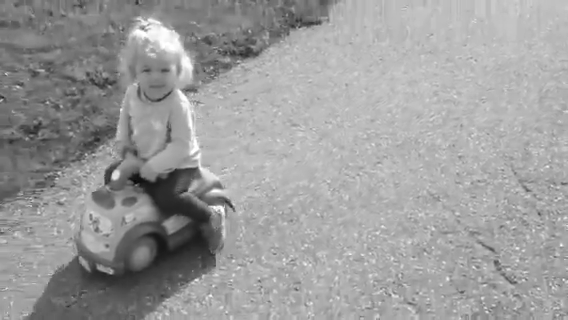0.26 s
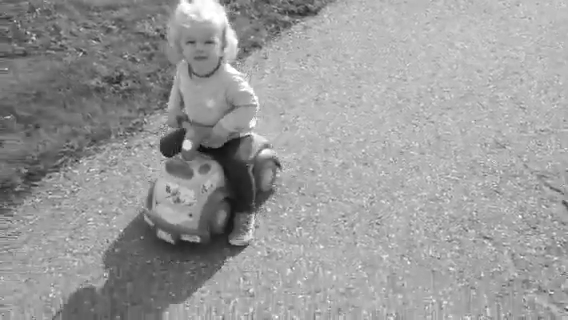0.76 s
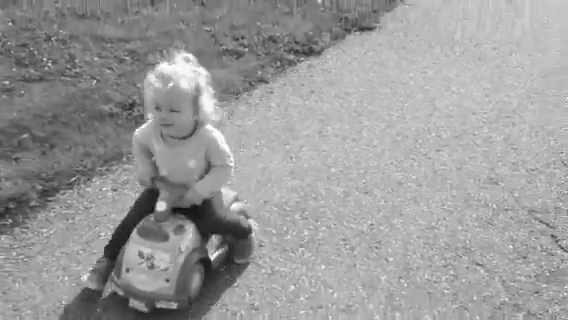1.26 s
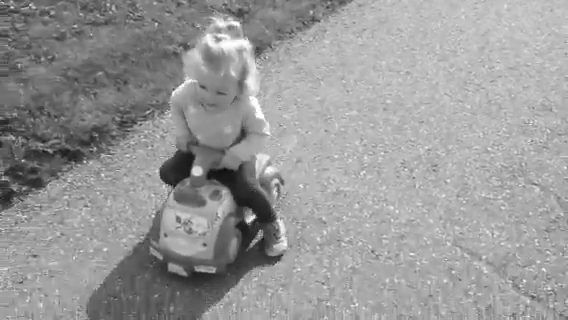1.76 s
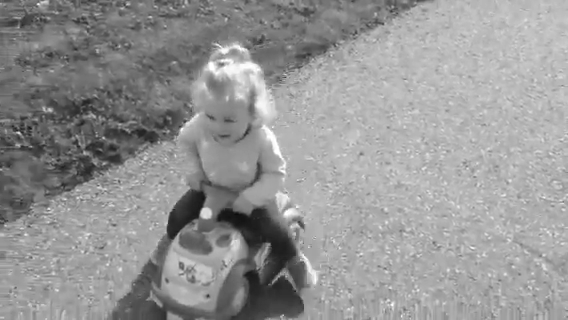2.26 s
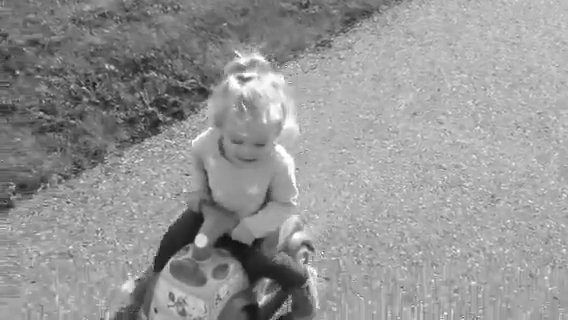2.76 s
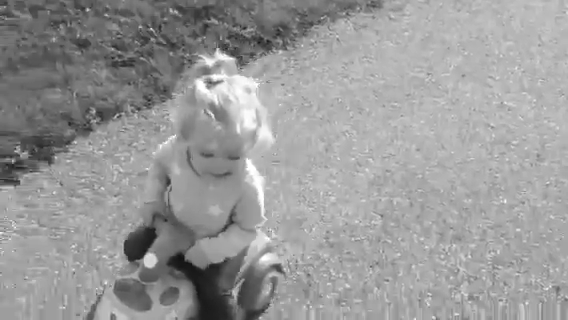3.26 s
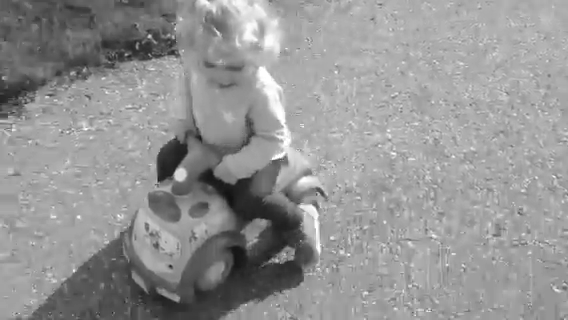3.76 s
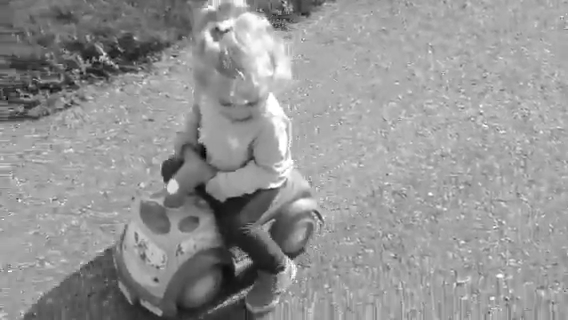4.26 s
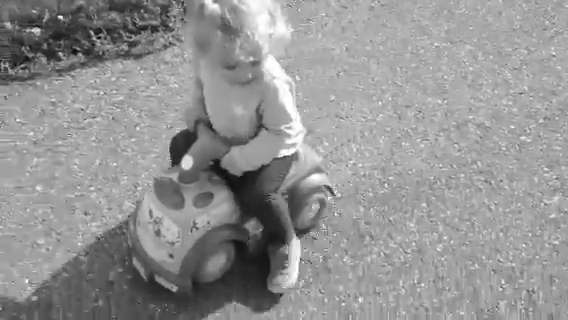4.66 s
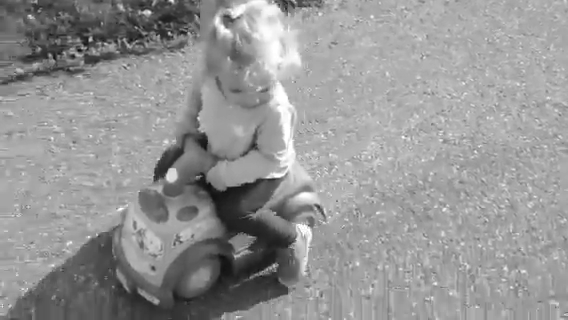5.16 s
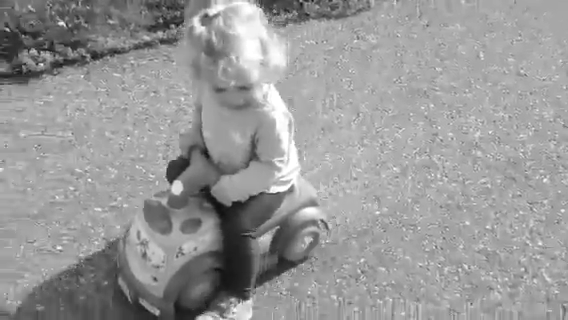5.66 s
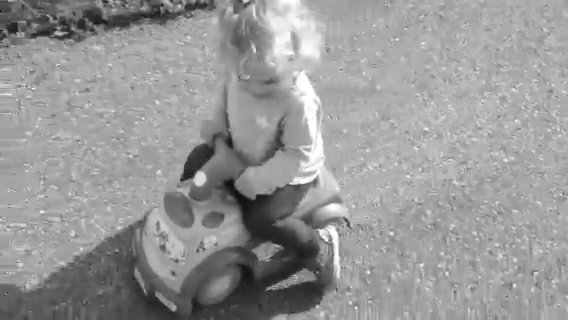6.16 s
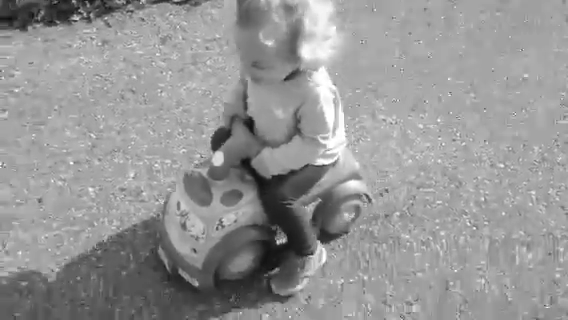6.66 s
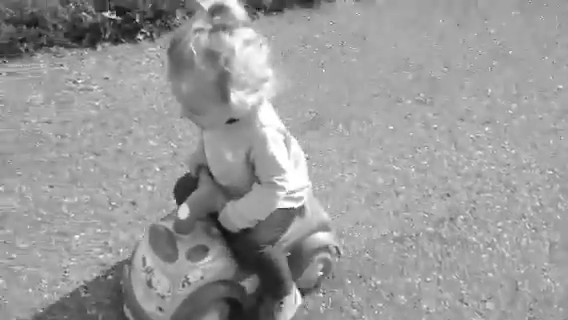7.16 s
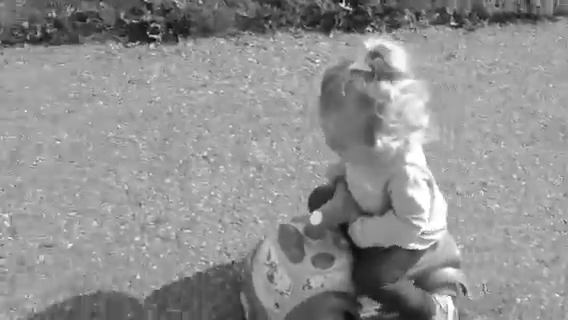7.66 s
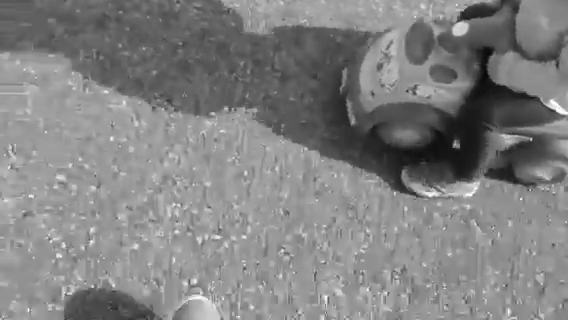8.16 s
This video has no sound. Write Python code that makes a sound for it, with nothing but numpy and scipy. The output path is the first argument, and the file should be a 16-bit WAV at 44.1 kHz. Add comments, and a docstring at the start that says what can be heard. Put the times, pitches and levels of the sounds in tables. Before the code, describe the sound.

A small plastic ride-on toy rolls unevenly along gritty pavement outdoors, booming hollowly, rattling and pinging, with brief scuffs, dull bumps and light wind puffs.

```python
"""Plastic ride-on toy on asphalt

A hollow toy is pushed along rough asphalt, a few steps from a hand-held microphone.
Random stone contacts excite resonances: the body booms, the hard wheels grind, ring and ping.
Noise bursts make cracking grit, decaying tones clicking parts; a wheel whines, shoes scuff in gritty bands.
Thuds are short swells of a low tone; light wind and a faint outdoor hiss are shaped noise."""
import sys
import numpy as np
from scipy import signal
from scipy.fft import rfft, irfft, next_fast_len
from scipy.io import wavfile
from scipy.ndimage import uniform_filter1d, map_coordinates

SR = 44100
rng = np.random.default_rng(int(sys.argv[2]) if len(sys.argv) > 2 else 0)


def unload_audio(sound):
    """Save the sound as a 16-bit wav file, at the path given as the first command line argument."""
    columns = np.transpose(np.atleast_2d(sound))
    # keep every value between -1 and 1, then stretch to whole-number steps
    steps = np.round(np.clip(columns, -1, 1) * 32767)
    wavfile.write(sys.argv[1], SR, steps.astype(np.int16))


N = 371763  # samples

# Rolling levels: [t/s, shell boom/dB, wheel-wall grind/dB, rim ring/dB]
ROLL_LEVELS = [(0.0, -55, -57.5, -64.5), (0.35, -55, -60.5, -63.5), (0.77, -50, -55.5, -60),
               (0.98, -46, -58, -69), (1.13, -48, -56, -62.5), (1.45, -51.5, -59.5, -62.5),
               (1.95, -50.5, -57, -66), (2.21, -45.5, -57, -65), (2.42, -45, -52.5, -60),
               (2.72, -46, -51, -61.5), (3.03, -43.5, -53, -61), (4.04, -45, -54.5, -63.5),
               (4.41, -46.5, -51.5, -61.5), (4.88, -46, -55.5, -63.5), (5.28, -45, -55.5, -58.5),
               (5.59, -45, -55, -64.5), (5.99, -42.5, -54.5, -61.5), (6.29, -47, -55, -64),
               (7.28, -47, -57.5, -61), (7.73, -48, -56.5, -69), (8.03, -44, -53, -62.5),
               (8.43, -46.5, -52.5, -65.5)]
# Rim pitch, rising at first, wavering, lower again at the end: [t/s, f/Hz]
RIM_PITCH = [(0, 1970), (2.1, 2110), (4.0, 2200), (5.3, 2140), (6.6, 2180), (8.43, 1940)]


def amp(db):
    """Decibels to gain."""
    return 10 ** (np.asarray(db) / 20)


def unit(x):
    """Scale to rms 1."""
    return x / np.sqrt(np.mean(x ** 2, axis=-1, keepdims=True) + 1e-20)


def shape(points):
    """Magnitude response through (f/Hz, level/dB) points on a log-frequency axis."""
    f, v = np.transpose(points)
    return lambda hz: amp(np.interp(np.log(hz + 1), np.log(f + 1), v))


def modes(table):
    """Causal response of (f/Hz, width/Hz, level/dB) resonances, summed with alternating sign."""
    def response(f):
        total = 0
        for k, (centre, width, db) in enumerate(table):
            damping = 1j * f * width
            total = total + (-1) ** k * amp(db) * damping / (centre * centre - f * f + damping)
        return total
    return response


def filtered(x, response):
    """Apply a complex frequency response by zero-padded FFT."""
    n = x.shape[-1]
    m = next_fast_len(n + min(n, 8192), real=True)
    return irfft(rfft(x, m) * response(np.fft.rfftfreq(m, 1 / SR)), m)[..., :n]


def wobble(rate, at=None):
    """Smooth random curve, rate knots per second, at all samples or at the given ones."""
    samples = np.arange(N) if at is None else at
    return map_coordinates(rng.standard_normal(N // 100), [samples * rate / SR])


def stones(rate, spread_db, smooth):
    """Random contacts, rate per second, of long-tailed size, plus a smooth share of rubbing noise."""
    hit = rng.random(N) < rate / SR
    sizes = rng.standard_normal(N) * amp(spread_db * rng.exponential(size=N))
    return unit(hit * sizes) + smooth * rng.standard_normal(N)


def curve(rows, column):
    """One column of a time table, interpolated at every sample."""
    rows = np.array(rows)
    return np.interp(np.arange(N) / SR, rows[:, 0], rows[:, column])


def burst(t, t60, rise):
    """Contact envelope, peak 1: quick rise, exponential fall; times in s."""
    fade = amp(-60 * t / max(t60, .005)) * (1 - np.exp(-t / rise))
    return fade / fade.max()


def random_patches(dims, frames):
    """Random time-frequency field, smoothed over 4 bins and the given frames."""
    across = uniform_filter1d(rng.standard_normal(dims), size=4, axis=0)
    return uniform_filter1d(across, size=frames, axis=1)


def patchy(spectrum, patchy_db):
    """Coloured noise whose bands flare at random, so bursts differ in colour."""
    z = signal.stft(rng.standard_normal(N), nperseg=128)[2]
    field = random_patches(z.shape, frames=6)
    noise = signal.istft(z * amp(patchy_db * field / field.std()), nperseg=128)[1][:N]
    return unit(filtered(noise, shape(spectrum)))


def wall_response(f):
    """Resonances of the wheel walls, rolled off above 2200 Hz."""
    # Wheel-wall modes: [f/Hz, width/Hz, level/dB]
    wall_modes = [(534.4, 93, 1.5), (880, 139, -3), (1188, 190, -9.5)]
    return modes(wall_modes)(f) / (1 + (f / 2200) ** 4)


def rolling():
    """Stones under the wheels shake shell, wheel walls and rims; bumps swell all three together."""
    # Hollow-shell modes: [f/Hz, width/Hz, level/dB]
    shell_modes = [(209.4, 78.4, -4.5), (283.4, 64.2, 0), (347.6, 73, -3), (441.7, 93, -8.5)]

    def shell_response(f):
        highpass = (f / 140) ** 2 / (1 + (f / 140) ** 2)
        return modes(shell_modes)(f) * highpass / (1 + (f / 900) ** 2)

    bumps, road = wobble(22), stones(300, 1.42, smooth=0)
    shell_drive = road + 0.83 * rng.standard_normal(N)
    body = filtered(amp(1.43 * bumps + 0.94 * wobble(45)) * shell_drive, shell_response)
    wall_drive = road + 1.57 * rng.standard_normal(N)
    grind = filtered(amp(1.14 * bumps + 1.34 * wobble(60)) * wall_drive, wall_response)
    tread = amp(1.56 * bumps + 2.14 * wobble(30)) * stones(550, 1.4, smooth=1.0)
    boom = amp(curve(ROLL_LEVELS, column=1)) * unit(body)
    return boom + amp(curve(ROLL_LEVELS, column=2)) * unit(grind) + rims(tread)


def rims(tread):
    """Rims ring at a pitch wandering as the toy turns and the load shifts; the tread rasps above it."""
    # Tread-rasp modes: [f/Hz, width/Hz, level/dB]
    tread_modes = [(2910, 590, -3.5), (4050, 2400, -14)]
    f, t, z = signal.stft(tread, SR, nperseg=512)
    s, hz = np.transpose(RIM_PITCH)
    centre = np.interp(t, s, hz) * (1 + 0.067 * wobble(6.8, t * SR))
    off = (f[:, None] ** 2 - centre ** 2) / (f[:, None] + 1)
    shelf = 1 / (1 + (off / np.where(off < 0, 2600, 650)) ** 4)  # broad below the ring, steep above
    gain = shelf + 0.1 / (1 + (off / 110) ** 2)
    gain *= amp(1.8 * unit(random_patches(z.shape, frames=7)))  # random patches make the ring uneven
    ring = signal.istft(z * gain, SR, nperseg=512)[1][:N]

    def rasp_response(f):
        return modes(tread_modes)(f) * f ** 2 / (f ** 2 + 2600 ** 2) / (1 + (f / 5500) ** 4)

    rasp = filtered(tread, rasp_response)
    ring_db = curve(ROLL_LEVELS, column=3)
    rasp_db = -75 + 0.64 * (ring_db - ring_db.mean())  # partly follows the ring
    return amp(ring_db) * unit(ring) + amp(rasp_db) * unit(rasp)


def pings():
    """Single stones ping the plastic: short decaying tones at chance pitches, following the rims' level."""
    pings_per_s, t60_cycles, spread_db = 140, 30, 2
    middle_hz, spread_octaves = 1416, 0.744
    when, size, pitch = np.transpose(rng.random((int(pings_per_s * N / SR), 3)))
    scatter = np.log(pitch / (1 - pitch)) / 2  # logistic
    hz = middle_hz * 2 ** (spread_octaves * scatter)[:, None].clip(-1.3, 1.3)
    k = np.arange(SR // 30)
    cycles = hz * k / SR
    fade = amp(-60 * cycles / t60_cycles - spread_db * np.log(size + 0.014)[:, None])
    tones = fade * (1 - np.exp(-cycles / 2)) * np.sin(2 * np.pi * cycles)
    tones *= (middle_hz / hz) ** 1.3  # high pings are weaker
    index = (when * N).astype(int)[:, None] + k
    out = np.bincount(index.ravel(), tones.ravel())[:N]
    return amp(curve(ROLL_LEVELS, column=3) - 2.5) * unit(np.pad(out, (0, N - len(out))))


def air():
    """Lumpy wind on the microphone port and a smooth far hiss, both shaped noise."""
    # Wind level: [t/s, level/dB]
    gust_levels = [(0, -58.5), (.5, -57.5), (1.3, -57.5), (1.7, -46.5), (2.15, -43), (2.38, -48.5),
                   (2.55, -44.5), (2.8, -52), (2.94, -44.5), (3.3, -55.5), (4.2, -55.5), (5.15, -56.5),
                   (5.46, -53.5), (6.3, -55.5), (7.3, -57), (7.6, -52), (8.05, -58), (8.2, -46),
                   (8.3, -35.5), (8.36, -41), (8.43, -51)]
    # Relative wind spectrum: [f/Hz, level/dB per Hz]
    wind_spectrum = [(15, -60), (25, -27), (54, -21.5), (104, -4.5), (156, 2), (231, -6.5), (260, -4),
                     (340, -35), (570, -120)]
    # Relative hiss spectrum: [f/Hz, level/dB per Hz]
    hiss_spectrum = [(1500, -33), (3000, 1.5), (4500, -1), (7000, -2.5), (9500, -9.5), (12000, -5.5),
                     (14000, -1), (15200, -1)]
    wind = unit(amp(3.3 * wobble(16)) * filtered(rng.standard_normal(N), shape(wind_spectrum)))
    hiss = unit(amp(1.3 * wobble(18.0)) * filtered(rng.standard_normal(N), shape(hiss_spectrum)))
    return amp(curve(gust_levels, column=1)) * wind + amp(-74.5) * hiss


def grit():
    """Small stones crack under tread and shoes as noise bursts, over a clumped fine crackle."""
    # Loud cracks: [t/s, nominal peak/dB, upper band re lower/dB, brightest f/Hz]
    crack_events = [(0.0518, -55, -8, 4280), (0.179, -59, -5, 4100), (0.224, -51, -12, 4250),
                    (0.304, -42.5, -9, 7700), (0.3722, -45, -11, 4400), (0.551, -54.5, 0, 4290),
                    (0.7701, -64, 3, 6980), (0.9, -50, -5, 7500), (1.1568, -61, -1, 4240),
                    (1.194, -58, -1, 6580), (1.205, -64, -3, 6500), (1.27, -57, -2, 4300),
                    (1.353, -54, -3, 4330), (1.387, -60, -15, 4300), (1.647, -49.5, -16, 4150),
                    (1.847, -50, -2, 4100), (1.8996, -56, -5, 4220), (1.9188, -35, -6, 4770),
                    (1.9395, -42, -6, 7000), (1.9482, -35, 0, 7400), (1.9855, -44, -13, 4590),
                    (2.182, -57, -3, 4240), (2.2358, -62, -3, 6120), (2.282, -41, -10, 6670),
                    (2.3057, -58, -2, 4130), (2.3487, -36.5, -1.5, 6370), (2.405, -58, 5, 6910),
                    (2.4872, -56, -5, 7310), (2.5047, -52, -11, 4270), (2.5725, -57, 4, 7420),
                    (2.6145, -59, -5, 6500), (2.7511, -56, -2, 4300), (2.8734, -50, -14, 4000),
                    (2.894, -53.5, -2, 6330), (2.998, -48, -6, 4320), (3.048, -55, -2, 4320),
                    (3.1623, -59, 2, 6610), (3.1792, -35, -7, 6660), (3.203, -46.5, -3, 6930),
                    (3.4131, -60, -1, 4100), (3.476, -43, -5, 4200), (3.631, -52, -9, 4390),
                    (3.687, -59, -3, 4300), (3.7243, -53, -12, 4180), (3.7753, -56, -8, 7000),
                    (3.791, -52, -4, 6760), (3.841, -58, -11, 7000), (3.9, -50, -5, 6740),
                    (4.0292, -62, -2, 4610), (4.153, -46, -16, 7470), (4.1764, -56, -2, 7210),
                    (4.197, -53, -5, 4240), (4.212, -59, -5, 7000), (4.5278, -47.5, -13, 5240),
                    (4.6195, -49.5, -6, 4180), (4.666, -49.5, -8, 4550), (4.7147, -60, -7, 4760),
                    (4.745, -50, -5, 7390), (4.779, -49, 1, 7630), (4.8007, -35, -12, 5180),
                    (4.8233, -31.5, -14, 5460), (4.954, -57, 0, 4230), (4.988, -55, -10, 6600),
                    (4.998, -55, -17, 5210), (5.029, -58, -8, 6500), (5.065, -43.5, -6, 4820),
                    (5.0734, -50, -7, 7490), (5.232, -55, -10, 4100), (5.3058, -55, -9, 7560),
                    (5.334, -38.5, -9, 4250), (5.399, -51, -13, 4030), (5.436, -57, -5, 4240),
                    (5.468, -35.5, -9, 4770), (5.5607, -44, -10, 4800), (5.7563, -58, -8, 6970),
                    (5.7957, -47, -2, 6100), (5.83, -48, -16, 4000), (5.9055, -59, -3, 6890),
                    (5.95, -53, -7, 4510), (5.9837, -41.5, -11, 5470), (6.0356, -45, -1, 7200),
                    (6.0494, -54, -4, 7580), (6.0865, -53, -1, 4960), (6.2386, -56, -5, 7000),
                    (6.311, -57, -8, 7200), (6.4502, -54.5, -4, 7000), (6.501, -51.5, -1, 7240),
                    (6.563, -47, -13, 4200), (6.6004, -58, -8, 6780), (6.6444, -40.5, -12, 7510),
                    (6.6592, -35, -3.5, 7440), (6.7093, -50.5, -10, 7120), (6.772, -51, -8, 4490),
                    (6.8693, -49, -10, 6960), (6.951, -49, -14, 4810), (6.971, -57, -6, 4140),
                    (7.035, -36, -7, 4300), (7.107, -52, -10, 4010), (7.2688, -61, -12, 4020),
                    (7.3, -53, -6, 4310), (7.3913, -53, -8, 4990), (7.439, -48, -5, 7000),
                    (7.4475, -40.5, -7, 7400), (7.456, -44, -3, 7350), (7.5976, -60, 0, 7000),
                    (7.6735, -55, -16, 4410), (7.7026, -50, -6, 4470), (7.764, -41, -14, 4180),
                    (7.884, -60, 2, 4300), (7.991, -48, -27, 4660), (8.0296, -54, -1, 7160),
                    (8.064, -40, -12, 5430), (8.125, -55, -16, 5030), (8.214, -46, -19, 4530),
                    (8.2468, -46, -5, 4620), (8.26, -44, -15, 4460), (8.2787, -35, -14, 4840),
                    (8.306, -50, -11, 4500), (8.3584, -54, -7, 4940), (8.4203, -40, -5, 4350)]
    # Relative lower-band spectrum: [f/Hz, level/dB per Hz]
    low_spectrum = [(2400, 0), (3600, -10), (5000, -11.5), (5800, -15), (6900, -8), (8200, -15.5),
                    (9600, -30), (11000, -36)]
    # Relative upper-band spectrum: [f/Hz, level/dB per Hz]
    top_spectrum = [(8000, -23), (9800, -12.5), (11200, -5), (12200, -10.5), (13800, 0.5), (15000, -5.5)]
    crest_db, ripple_db = 7, 4  # nominal peak over rms; chance peaks in the colour
    low, top, t = np.zeros(N + SR), np.zeros(N + SR), np.arange(SR // 20) / SR
    fade = burst(t, 0.018, rise=.0011) + 0.083 * burst(t, 0.097, rise=.004)  # snap, then crumbs
    for s, db, top_db, hz in crack_events:
        ripple = ripple_db * rng.standard_normal(size=30)

        def colour(f):
            uneven = amp(np.interp(f, np.linspace(0, SR / 4, len(ripple)), ripple))
            bright = 0.57 + np.exp(-(np.log((f + 1) / hz) / 0.19) ** 2)
            return uneven * shape(low_spectrum)(f) * bright

        noise = unit(filtered(rng.standard_normal(len(t)), colour))
        low[round(s * SR):][:len(t)] += amp(db - crest_db) * fade * noise
        top[round(s * SR):][:len(t)] += amp(db + top_db - crest_db) * fade
    clumps = amp(0.77 * wobble(2.1)) * np.abs(stones(60, 1.2, smooth=0))
    fine = unit(signal.fftconvolve(clumps, burst(t, 0.037, rise=0.0008))[:N])
    crackle = amp(-77.5) * fine * patchy(low_spectrum, patchy_db=2.5)
    upper = (top[:N] + amp(-85.5) * fine) * patchy(top_spectrum, patchy_db=3)
    return low[:N] + crackle + upper


def clicks():
    """Loose parts click: short plastic ring over a dull knock; a faint rattle at the rims' pitch fills in."""
    # Clicks: [t/s, nominal peak/dB, ring f/Hz, knock re ring/dB, t60/s]
    click_events = [(0.2238, -31, 2270, -11, 0.02), (0.3042, -33.5, 2230, -11, 0.022),
                    (0.374, -44, 1960, -7, 0.074), (0.478, -36.5, 2200, 0.5, 0.033),
                    (0.666, -41.5, 2300, -21, 0.028), (1.3915, -39, 1400, 7, 0.055),
                    (1.4301, -36.5, 2250, -6, 0.023), (1.8865, -48, 1860, 11, 0.021),
                    (1.9159, -30, 2350, -7, 0.039), (1.9397, -36.5, 2440, -6, 0.025),
                    (1.9486, -29.5, 2300, -4, 0.037), (1.9855, -46, 2300, -5, 0.04),
                    (2.2344, -47, 2360, -5, 0.035), (2.283, -38.5, 2160, -8, 0.016),
                    (2.2787, -40, 3070, -6, 0.018), (2.3156, -43.5, 2230, 2, 0.13),
                    (2.3507, -30.5, 2020, -28, 0.017), (2.351, -30, 3070, -22, 0.016),
                    (2.505, -46.5, 2080, 6, 0.03), (2.7497, -50, 3230, -12, 0.025),
                    (2.9818, -42.5, 2380, 7, 0.065), (2.999, -41, 2200, -9, 0.02),
                    (3.048, -46.5, 2220, -3, 0.038), (3.0814, -39, 2087, 4.5, 0.1),
                    (3.1794, -33, 2920, 8, 0.033), (3.2036, -45, 2290, -12, 0.04),
                    (3.4146, -43, 1920, -4, 0.065), (3.823, -40.5, 2090, -26, 0.051),
                    (3.9153, -36, 2180, 7, 0.036), (4.495, -42, 2410, -8, 0.036),
                    (4.6117, -49, 2170, 9, 0.048), (4.648, -50, 1670, 16.5, 0.026),
                    (4.7387, -42.5, 2480, -17, 0.07), (4.761, -41, 2500, -10, 0.022),
                    (4.7805, -41, 1820, -9, 0.045), (4.7993, -40, 1820, 4, 0.032),
                    (4.824, -49, 1970, -11, 0.046), (4.915, -48, 2040, -12, 0.04),
                    (4.999, -47, 3080, -11, 0.02), (5.3355, -36.5, 3000, 6.5, 0.034),
                    (5.465, -47, 2210, -4, 0.051), (5.559, -38, 2260, 4.5, 0.068),
                    (5.7755, -42, 1790, 4, 0.03), (5.9505, -48.5, 2900, -21, 0.03),
                    (5.9834, -35.5, 2160, -17, 0.021), (6.0347, -39.5, 2360, 1, 0.046),
                    (6.0745, -45, 2140, 10, 0.1), (6.101, -45, 2190, 4, 0.025),
                    (6.6384, -41, 2100, 3, 0.039), (6.659, -37, 2730, -7, 0.025),
                    (6.9498, -39.5, 2217, -23, 0.035), (7.0353, -40.5, 2310, 3, 0.044),
                    (7.0842, -35, 1825, -9, 0.032), (7.2689, -38.5, 1850, 3, 0.032),
                    (7.3926, -38, 1820, -5, 0.026), (7.449, -33.5, 2830, 0, 0.048),
                    (7.503, -47, 1800, 9, 0.045), (7.5178, -42, 1904, 7.5, 0.076),
                    (7.6038, -50.5, 2610, -13, 0.074), (7.7794, -49.5, 2320, 2, 0.023),
                    (7.9418, -46, 2160, -23, 0.071), (8.0432, -41.5, 1860, -18, 0.035),
                    (8.2142, -40, 1940, -18, 0.02), (8.2482, -49.5, 1830, 16, 0.035),
                    (8.2816, -48, 1960, -3, 0.029)]
    rattle_per_s, rattle_db, rattle_spread_db, rattle_t60_s = 3, -54, 2.5, 0.045
    crest_db = 8  # nominal peak over rms
    out, t = np.zeros(N + SR), np.arange(SR // 14) / SR
    times, pitch = np.transpose(RIM_PITCH)
    rattle = []
    for u, v in rng.random((rattle_per_s * N // SR, 2)):
        s = u * N / SR
        rattle.append((s, rattle_db - rattle_spread_db * np.log(v), np.interp(s, times, pitch), -6, rattle_t60_s))
    for s, db, hz, knock_db, t60 in rattle + list(click_events):
        dry = max(hz / 2200, 1) ** 4.5  # above 2200 Hz: broader ring, less clear tone
        noise = rng.standard_normal((3, len(t)))  # ring, knock, ragged chatter of both

        def ring_response(f):
            plastic = modes([(hz, 200 * dry, 0), (1.48 * hz, 320, -12), (1.9 * hz, 400, -16)])(f)
            highpass = f ** 4 / (f ** 4 + (.7 * hz) ** 4)
            return plastic / (1 + (f / 4500) ** 4) * highpass

        ring = unit(filtered(noise[0], ring_response))
        ring = unit(ring + 1.3 / dry * np.sin(2 * np.pi * hz * t))
        knock = unit(filtered(noise[1], wall_response))
        chatter_db = 0.97 * uniform_filter1d(noise[2], size=40) * np.sqrt(40)
        envelope = amp(db - crest_db + chatter_db) * burst(t, t60, rise=0.00079)
        out[round(s * SR):][:len(t)] += envelope * (ring + amp(knock_db) * knock)
    return out[:N]


def thuds():
    """Low blows from bumps of the shell and puffs on the microphone: a sine under a skewed bell."""
    # Thuds: [middle t/s, swell level/dB, f/Hz, nominal half length/cycles]
    thud_events = [(0.233, -36, 470, 0.57), (0.479, -42.5, 490, 1.2), (1.3967, -23.5, 307, 0.61),
                   (1.659, -37, 156, 0.9), (1.77, -31.5, 198, 1.1), (1.9532, -28.5, 527, 1.1),
                   (2.136, -20.5, 280, 0.47), (2.158, -33, 216, 1.5), (2.291, -30, 323, 0.29),
                   (2.335, -28.5, 299, 0.4), (2.5572, -31, 223, 0.35), (2.675, -28, 250, 0.24),
                   (2.889, -30.5, 242, 0.47), (3.106, -34.5, 312, 2.7), (3.4202, -34.5, 382, 2.5),
                   (3.4953, -35, 386, 2.3), (5.052, -31, 270, 0.89), (5.082, -29, 315, 0.25),
                   (5.566, -30.5, 374, 0.57), (6.082, -31, 347, 0.63), (6.246, -34, 287, 1.8),
                   (7.059, -36.5, 258, 1.1), (7.16, -35, 253, 0.77), (7.2716, -34, 440, 2.5),
                   (8.097, -33, 150, 0.5), (8.131, -30.5, 219, 0.52), (8.283, -34, 190, 0.83),
                   (8.311, -32, 176, 1.2), (8.338, -30, 190, 0.32), (8.388, -25.5, 213, 0.31)]
    out, t = np.zeros(N + SR), np.arange(-SR // 20, SR // 20) / SR
    for s, db, hz, cycles in thud_events:
        half = max(cycles, .3) / hz
        swell = np.exp(-(t / np.where(t < 0, 1.13 * half, 1.62 * half)) ** 2)  # rises faster than it dies
        out[round(s * SR):][:len(t)] += amp(db) * swell * np.sin(2 * np.pi * hz * t)
    return out[SR // 20:][:N]


def scuffs():
    """Soles drag over asphalt: gritty bands slide down, each catching on its own, under bell strokes."""
    # Strokes: [middle t/s, nominal half length/s, level/dB, band-width factor]
    strokes = [(0.872, 0.078, -35.5, 1.4), (1.174, 0.018, -48, 1.8), (1.385, 0.03, -39.5, 2.1),
               (3.32, 0.063, -52.5, 4), (3.46, 0.069, -42, 2.5), (3.895, 0.054, -46, 1.7),
               (4.164, 0.048, -50, 2.8), (5.21, 0.075, -48.5, 2.4), (8.273, 0.05, -54, 0.72)]
    # Rubbing-sole bands: [f/Hz, width before factor/Hz, level/dB]
    sole_bands = [(335, 260, -5), (924, 270, 3), (2254, 210, 2), (3300, 117, -8), (4150, 220, -16),
                  (7230, 580, -26), (14500, 1200, -25)]
    f, t, z = signal.stft(stones(2500, 0.24, smooth=0.72), SR, nperseg=512)
    at = np.minimum((t * SR).astype(int), N - 1)
    table = np.transpose(strokes)
    nearest = np.abs(t[:, None] - table[0]).argmin(axis=1)
    s, half, db, wide = table[:, nearest]
    phase, f, gain = (t - s) / half, f[:, None] + 1, 0
    for hz, w, band_db in sole_bands:
        centre = hz * (1 - .04 * phase.clip(-2, 2) + .02 * wobble(14, at))
        height = min(hz, 4000) / 2000
        stroke = np.exp(-np.abs(phase * height ** 0.25) ** 3.6)  # higher bands have shorter strokes
        bright_db = -(wide - 2) * np.log2(height)
        level = amp(band_db + bright_db + 1.3 * wobble(45, at)) / np.sqrt(wide)
        band = 1 / (1 + ((f ** 2 - centre ** 2) / (f * w * wide)) ** 2)
        gain = gain + stroke * level * band
    gain *= amp(db)
    return signal.istft(z * gain, SR, nperseg=512)[1][:N]


def whines():
    """A wheel whines faintly at times: a fluttering sine that wavers and sinks a little."""
    # Whines: [middle t/s, half length/s, level before flutter/dB, middle f/Hz]
    whine_events = [(2.12, .07, -66, 2600), (2.31, .09, -65, 2330), (2.63, .11, -62, 2360),
                    (2.83, .09, -61.5, 2300), (2.47, .12, -61.5, 1540), (3.9, .09, -63, 2200),
                    (5.22, .08, -66, 1980), (6.75, .06, -67, 1900), (7.3, .07, -64, 1800),
                    (7.52, .05, -63, 1780)]
    t, out = np.arange(N) / SR, np.zeros(N)
    waver, flutter = wobble(12), .9 + .4 * wobble(55)
    for s, half, db, hz in whine_events:
        near = np.abs(t - s) < 2 * half
        pitch = hz * (1 - .12 * (t[near] - s) + .008 * waver[near])  # sinks 12 % per s
        swell = np.exp(-((t[near] - s) / half) ** 4)
        tone = np.sin(2 * np.pi * np.cumsum(pitch) / SR)
        out[near] += amp(db) * flutter[near] * swell * tone
    return out


def scene():
    """Sum of all sources at one microphone."""
    return (rolling() + pings() + grit() + clicks() + thuds() + scuffs() + air() + whines())[None]


def record(dry):
    """Microphone chain: thin deep bass, steep drop near the top, nothing above the band limit."""
    edge_hz, limit_hz = 15350, 16450

    def response(hz):
        bass = (1j * hz / 60) / (1 + 1j * hz / 60)
        treble = amp(-np.clip(hz - edge_hz, 0, None) * 0.044 - 6.5 * (hz > edge_hz))
        return (hz < limit_hz) * bass * treble

    return filtered(dry, response)


dry = scene()
out = record(dry)
unload_audio(out)
```